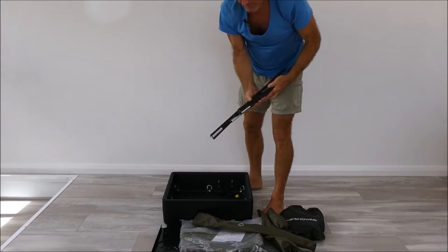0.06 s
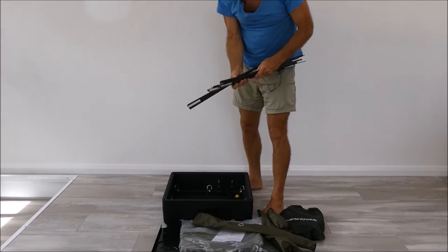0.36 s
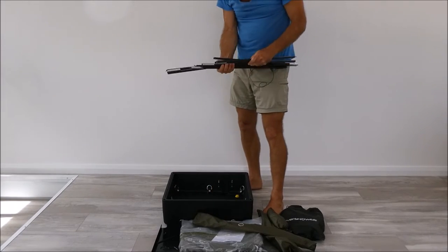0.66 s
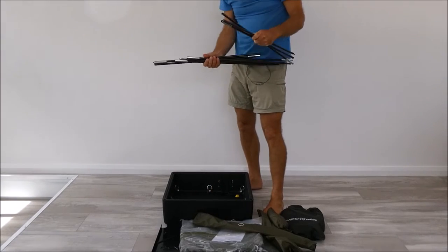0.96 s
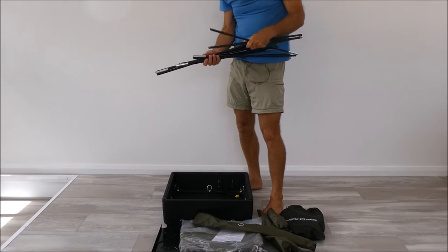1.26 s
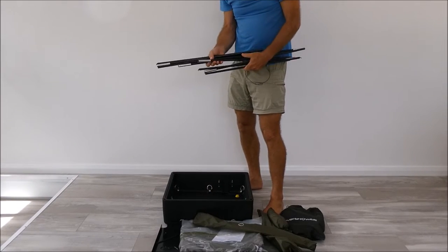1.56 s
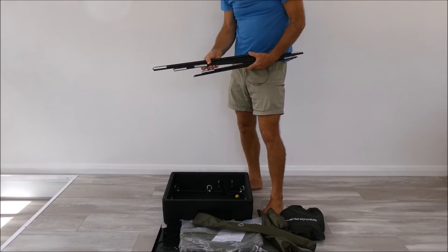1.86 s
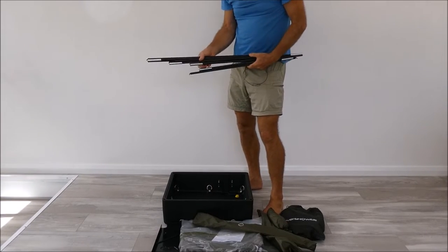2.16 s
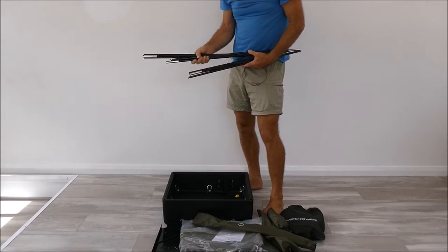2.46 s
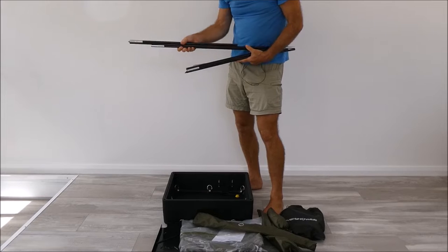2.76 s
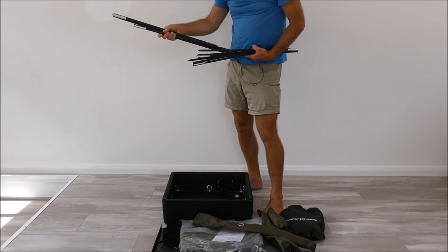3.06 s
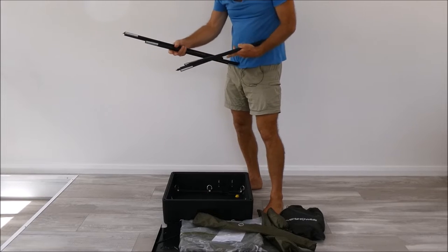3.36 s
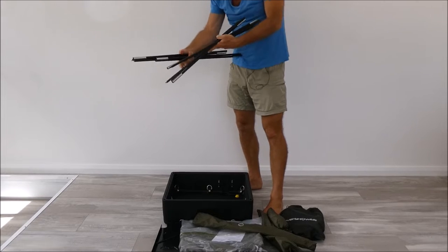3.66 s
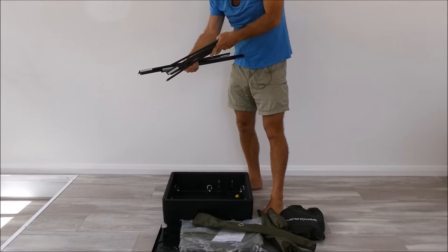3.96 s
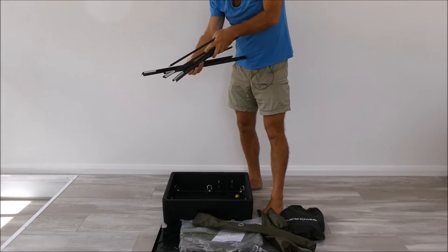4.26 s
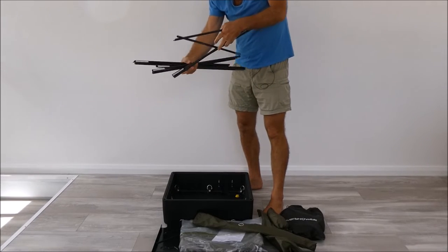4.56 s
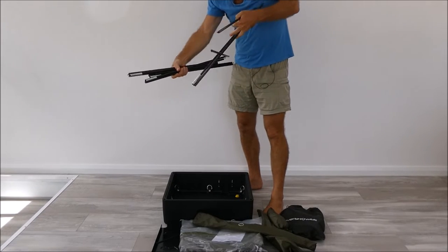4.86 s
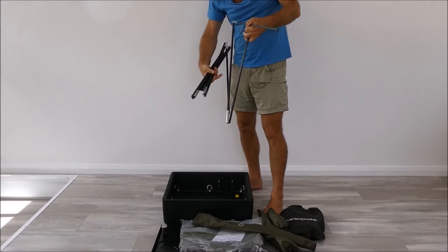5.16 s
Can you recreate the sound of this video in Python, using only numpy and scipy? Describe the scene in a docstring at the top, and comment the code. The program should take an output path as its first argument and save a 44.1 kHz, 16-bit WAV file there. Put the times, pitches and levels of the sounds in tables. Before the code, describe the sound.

Jointed metal poles are sorted by hand in a bare room while crickets chirr steadily outside. Clothes rustle softly at first as the tubes slide and tick together, and a joint squeaks faintly. The short, damped clinks then come thicker and harder, before ending with a last slide, two light clinks and a brief chirp from a closer cricket. The sound is mono, with a slight room echo.

```python
"""Jointed metal tent poles are sorted by hand in a bare room while crickets chirr outside.
First clothes rustle, a closer cricket calls and the gripped tubes slide and knock in short damped clinks.
From 1 to 1.8 s a joint squeaks faintly. From 2.3 to 4.8 s the knocks come thicker and harder;
at the hardest the recorder's gain control ducks with a brief low thump, then creeps back.
After 5 s come a last slide, two light clinks and one more close cricket call."""
import sys
import numpy as np
from scipy import signal
from scipy.fft import rfft, irfft
from scipy.io import wavfile
from scipy.ndimage import uniform_filter1d, map_coordinates

SR = 44100
rng = np.random.default_rng(int(sys.argv[2]) if len(sys.argv) > 2 else 0)


def bounce(signal):
    """Save signal as a 16-bit WAV file at the path given by the first command-line argument."""
    frames = np.transpose(np.atleast_2d(signal))
    limited = np.clip(frames, -1, 1)
    pcm = np.round(limited * 32767).astype(np.int16)
    wavfile.write(sys.argv[1], SR, pcm)


N = 234642
TIME_S = np.arange(N) / SR


def from_db(db):
    """Decibels to gain."""
    return 10 ** (np.asarray(db) / 20)


def unit_rms(x):
    """Scale to rms 1."""
    return x / np.sqrt(np.mean(x ** 2) + 1e-20)


def in_time(rows):
    """Join (time, value) rows by straight lines."""
    return np.interp(TIME_S, *np.transpose(rows))


def at_hz(spectrum, hz):
    """Read a spectrum on a log-frequency axis."""
    knots_hz, db = np.transpose(spectrum)
    return np.interp(np.log(np.maximum(hz, 1)), np.log(knots_hz), db)


def coloured(x, spectrum):
    """Filter by a spectrum; rms 1."""
    gains = from_db(at_hz(spectrum, np.fft.rfftfreq(len(x), 1 / SR)))
    return unit_rms(irfft(rfft(x) * gains, len(x)))


def drift(rate_hz):
    """Smooth random curve; rms 1."""
    knots, coarse_s = rng.standard_normal(4096), TIME_S[::32]
    curve = map_coordinates(knots, [coarse_s * rate_hz], order=2, mode="wrap")
    return np.interp(TIME_S, coarse_s, unit_rms(curve))


def bump(middle_s, half_s):
    """Gaussian swell of height 1."""
    return np.exp(-((TIME_S - middle_s) / half_s) ** 2)


# room tone spectrum: (frequency [Hz], level [dB])
TONE_SPECTRUM = [(20, -32.5), (38, -12), (53, 8.5), (68, 2), (95, 2), (200, -4.5), (450, -5.5), (1000, -8),
                 (2500, -7), (8000, -13.5)]

def room_tone(tone_db=-57.0, hum_db=-70.0, hum_hz=67.0):
    """Steady low noise with a faint wavering hum."""
    tone = from_db(tone_db) * coloured(rng.standard_normal(N), TONE_SPECTRUM)
    hum_gain = from_db(hum_db + 3.0 * drift(11))
    hum = unit_rms(np.sin(2 * np.pi * hum_hz * TIME_S + 1.8 * drift(13)))
    return tone + hum_gain * hum


# floor and wall reflections: (delay [s], level [dB])
EARLY_ECHOES = [(.0047, -16), (0.0101, -23.5), (0.0156, -20)]

def room(x, t60_s=0.38, tail_db=-6.5, build_s=0.0024):
    """Add early echoes and a diffuse tail that favours no single pitch."""
    t = TIME_S[:SR // 2]
    spectrum = rfft(rng.standard_normal(len(t)) * from_db(-60 * t / t60_s))
    flattened = irfft(spectrum / np.sqrt(uniform_filter1d(np.abs(spectrum) ** 2, size=25)), len(t))
    tail = flattened * (1 - np.exp(-t / build_s)) * (1 - (t / t[-1]) ** 2)
    tail = coloured(tail, [(300, 1), (2100, 2), (3000, 0.5), (4500, -3.5), (7500, -1.5)])
    response = from_db(tail_db) * tail / np.sqrt(len(t))
    for delay_s, db in EARLY_ECHOES:
        response[int(delay_s * SR)] += from_db(db)
    return x + signal.fftconvolve(x, response)[:N]


# wing resonance: (frequency [Hz], level [dB])
WING_SPECTRUM = [(3400, -18), (3950, -14), (4400, -6.5), (4850, 1), (5300, 2), (5720, 0), (6160, -4),
                 (6400, -21), (7100, -22.5), (8000, -37.5)]

def cricket(pulse_hz, waver=0.000905, flicker_db=3.0, smear_rad=0.45, scatter_rad=0.88):
    """Wing pulse train; its overtones, shaped by the wing, flicker and are smeared by echoes."""
    phase = 2 * np.pi * np.cumsum(pulse_hz * (1 + waver * drift(14))) / SR
    out = 0
    for k in range(18, 32):
        gain = from_db(at_hz(WING_SPECTRUM, k * pulse_hz) + flicker_db * drift(14))
        out += gain * np.cos(k * phase + smear_rad * drift(16) + scatter_rad * drift(1.57))
    return unit_rms(out)


# near crickets: (wing pulse rate [Hz], level [dB])
NEAR_CRICKETS = [(220, 0), (216, -7.5), (209.2, -12), (238.5, -16)]
# far crickets: (frequency [Hz], level [dB])
FAR_SPECTRUM = [(2500, -30), (3900, -8.5), (4600, -8), (5250, 8.5), (5900, 1.5), (6400, -0.5), (7300, -8),
                (8000, -35.5)]

def chorus(near_db=-42.5, far_db=-46.0, throb_db=0.9):
    """A few near crickets over the blur of many far ones."""
    near = sum(from_db(db) * cricket(hz) for hz, db in NEAR_CRICKETS)
    near_gain = from_db(near_db + throb_db * drift(32))
    far = coloured(rng.standard_normal(N), FAR_SPECTRUM)
    return near_gain * near + from_db(far_db) * far


# calls of a closer cricket: (time [s], level [dB])
CLOSE_CALLS = [(.06, -39.5), (.48, -45), (.81, -41.5), (5.11, -38.5)]

def close_cricket(pulse_hz=220, wing_hz=5720, half_s=0.036, waver_rad=0.87):
    """Short calls: one wing resonance, throbbing with the wing pulses."""
    pulses = 1 + np.cos(2 * np.pi * pulse_hz * TIME_S + waver_rad * drift(30))
    wing = np.sin(2 * np.pi * wing_hz * TIME_S + waver_rad * drift(60))
    envelope = sum(from_db(db) * bump(time_s, half_s) for time_s, db in CLOSE_CALLS)
    return envelope * unit_rms(pulses * wing)


# clothes moving: (time [s], level [dB])
CLOTH_LEVELS = [(0, -65), (.15, -59.5), (.45, -69.5), (1.8, -69.5), (2.8, -73), (5.32, -67.5)]
# their rustle: (frequency [Hz], level [dB])
CLOTH_SPECTRUM = [(100, -19), (260, 1), (480, 4), (800, -5), (1400, -19.5), (3000, -23)]

def clothes(flutter_db=2.0):
    """Soft rustle of moving cloth, most while straightening up."""
    envelope = from_db(in_time(CLOTH_LEVELS) + flutter_db * drift(30))
    return envelope * coloured(rng.standard_normal(N), CLOTH_SPECTRUM)


# joint rubs: (time [s], pitch [Hz], level [dB], half length [s])
JOINT_RUBS = [(1.029, 2088, -43.5, 0.0048), (1.042, 2034, -49, 0.0093), (1.447, 2126, -49, 0.027),
              (1.658, 2014, -49, .02), (1.726, 2050, -49, .02)]

def squeaks(waver=0.045, rough_db=2.0):
    """Brief rough tones where a joint rubs."""
    bend, roughness = 1 + waver * drift(500), from_db(rough_db * drift(250))
    out = 0
    for time_s, hz, db, half_s in JOINT_RUBS:
        tone = np.sin(2 * np.pi * np.cumsum(hz * bend) / SR)
        out += from_db(db) * bump(time_s, half_s) ** 2 * tone
    return roughness * out


# tube modes, for slides and clinks: (frequency [Hz], level [dB])
TUBE_MODES = [(1070, -18.5), (1420, -22), (2020, -15.5), (2380, -11.5), (2930, -4.5), (3220, -3.5),
              (3620, 0), (3980, -3.5), (4330, 5), (4850, 6), (5230, 6), (5600, -2), (5930, 2.5), (6260, -1),
              (6850, 2), (7420, -0.5)]
# tubes sliding through the hands: (time [s], half length [s], level [dB])
SLIDE_STROKES = [(0.02, .07, -55), (0.683, .14, -50.5), (1.46, .16, -54), (1.795, 0.19, -49),
                 (2.4, 0.11, -49), (3.028, 0.28, -49), (4.45, 0.45, -52.5), (5.174, 0.15, -49)]

def sliding(slips_per_s=1100, size_db=2.0, clump_db=5.5, t60_s=0.0051, dull_db=-14.5, fidget_db=-61.5):
    """Tiny uneven slips excite the tube modes, in smooth strokes over a restless grip."""
    sizes = from_db(size_db * np.minimum(rng.exponential(1, N), 4) + clump_db * drift(35))
    slips = sizes * (rng.random(N) < slips_per_s / SR)
    ring, radius = 0, from_db(-60 / (t60_s * SR))
    for hz, db in TUBE_MODES:
        step_rad = 2 * np.pi * hz / SR
        gain = from_db(db + at_hz([(2800, 0), (5000, dull_db)], hz))
        feedback = [1, -2 * radius * np.cos(step_rad), radius ** 2]
        force = slips * rng.standard_normal(N) + 1e-18
        ring += gain * signal.lfilter([np.sin(step_rad)], feedback, force)
    stroke_power = sum((from_db(db) * bump(time_s, half_s)) ** 2 for time_s, half_s, db in SLIDE_STROKES)
    return np.sqrt(from_db(fidget_db) ** 2 + stroke_power) * unit_rms(ring)


def stray_touches(per_s=2.0, level_db=-44.5, top_hz=4470, t60_s=0.018):
    """Knock rows for faint touches at random gaps."""
    draws = rng.random((int(per_s * N / SR), 2))
    return [((slot + offset) / per_s, level_db, top_hz * 2 ** -octaves, t60_s)
            for slot, (offset, octaves) in enumerate(draws)]


# contact crack: (frequency [Hz], level [dB])
CRACK_SPECTRUM = [(100, -29.5), (600, -13.5), (1300, -11), (2300, 5.5), (4500, 5.5), (6500, 0),
                  (8000, -14.5)]

def clink(colour, ring_gain, t60_s, main_hz, main_db=-6.0, rise_s=0.00025, detune=0.011, spread_db=1.3):
    """Contact crack plus hand-damped tube modes; rms 1 over the first 7 ms."""
    t = TIME_S[:SR // 10]
    hz, mode_db = np.transpose(TUBE_MODES)
    # another tube and another spot at each knock
    tuning, strength, phase = rng.standard_normal((3, len(hz)))
    gains = from_db(mode_db + at_hz(colour, hz) + spread_db * strength)
    cycles = np.outer(hz * (1 + detune * tuning), t) + phase[:, None]
    ring = unit_rms(gains @ np.sin(2 * np.pi * cycles))
    ring += from_db(main_db) * unit_rms(np.sin(2 * np.pi * main_hz * t))
    crack = coloured(rng.standard_normal(len(t)), [(f, db + at_hz(colour, f)) for f, db in CRACK_SPECTRUM])
    envelope = from_db(-60 * t / t60_s) * (1 - np.exp(-(t / rise_s) ** 2))
    knock = (ring_gain * ring + crack) * envelope
    return knock / np.sqrt(np.mean(knock[:SR // 143] ** 2))


# dull body of the knocks: (time [s], gain [dB])
BODY_GAINS = [(0, 9), (.6, 4), (1.8, 6), (3.1, 1.5), (3.85, -6.5), (4.75, 0.5)]
# pole against pole: (time [s], level [dB], main ring [Hz], t60 [s])
KNOCKS = [(0.073, -37, 5700, 0.036), (0.092, -32.5, 4550, 0.015), (0.181, -36.5, 7440, 0.017),
          (0.28, -36.5, 7330, 0.045), (0.357, -35.5, 6860, 0.033), (0.5439, -33, 5900, 0.04),
          (0.598, -29, 5930, 0.063), (0.762, -33, 5150, .03), (1.452, -37, 4980, 0.034),
          (1.609, -36.5, 3950, 0.042), (1.765, -25.5, 5020, 0.027), (1.795, -32.5, 3090, 0.067),
          (2.107, -39, 4060, 0.058), (2.2879, -32.5, 5300, 0.015), (2.315, -37, 5540, 0.013),
          (2.349, -29.5, 6990, 0.039), (2.464, -39.5, 3080, 0.03), (2.583, -34, 7160, 0.015),
          (2.616, -32.5, 6130, .008), (2.6756, -23.5, 4330, 0.019), (2.6906, -19.5, 6740, 0.0095),
          (2.77, -29.5, 7060, .02), (2.784, -29.5, 7350, 0.015), (2.939, -35.5, 4860, .025),
          (2.949, -34.5, 6050, 0.027), (3.016, -29.5, 2870, 0.019), (3.034, -29.5, 3510, 0.034),
          (3.189, -36, 4900, 0.04), (3.21, -24, 3380, .028), (3.454, -43.5, 4470, 0.012),
          (3.709, -43, 4230, 0.022), (3.8545, -20, 3150, 0.019), (4.022, -38, 2850, 0.012),
          (4.2102, -19, 4794, 0.032), (4.2274, -25.5, 4210, 0.049), (4.264, -26, 5000, 0.0094),
          (4.29, -35.5, 2180, 0.026), (4.4192, -26.5, 3970, .024), (4.454, -36.5, 4300, 0.016),
          (4.542, -24.5, 6000, 0.05), (4.671, -33.5, 3980, 0.045), (4.69, -35, 3740, 0.043),
          (4.7203, -18.5, 3300, .018), (4.729, -32.5, 3810, 0.016), (4.777, -35, 5200, 0.024),
          (4.782, -27.5, 7430, 0.011), (4.8155, -30.5, 3230, 0.022), (4.826, -32, 3600, 0.011),
          (5.187, -40, 3540, 0.026), (5.232, -45.5, 6100, 0.014)]

def knocks(middle_hz=4470, low_db_per_oct=-9, high_db_per_oct=8.5,
           free_t60_s=0.019, grip_db_per_halving=6.5, usual_db=-28, hard_db_per_db=0.22):
    """Tubes strike each other: a higher ring is brighter overall, a tight grip leaves a dry tick."""
    out, body_db = np.zeros(N + SR), in_time(BODY_GAINS)
    for time_s, db, ring_hz, t60_s in KNOCKS + stray_touches():
        start, octaves = int(time_s * SR), np.log2(ring_hz / middle_hz)
        ring_gain = min(t60_s / free_t60_s, 1)
        grip_db = grip_db_per_halving * np.log2(ring_gain)
        hard_loss_db = hard_db_per_db * (db - usual_db)  # harder blow, shorter contact, weaker low modes
        low_db = -0.5 + low_db_per_oct * octaves - hard_loss_db + grip_db
        high_db = 1.5 + high_db_per_oct * octaves
        colour = [(1550, body_db[start] + grip_db), (2250, low_db), (2800, low_db),
                  (3800, 0), (5200, 0), (6200, high_db)]
        knock = clink(colour, ring_gain, t60_s, ring_hz)
        out[start:start + len(knock)] += from_db(db) * knock
    return out[:N]


def gain_thumps(rise_s=0.00024, thump_db=-43.5, hard_db=-20.5, growth_db_per_db=2.2):
    """Brief low thump as the recorder's gain control clamps down on the hardest knocks."""
    impulses, age = np.zeros(N), TIME_S[:SR // 100] / rise_s
    for time_s, db, _, _ in KNOCKS:
        impulses[int(time_s * SR)] = from_db(thump_db + growth_db_per_db * (db - hard_db))
    return signal.fftconvolve(impulses, age * np.exp(1 - age))[:N]


def scene():
    """Room tone, crickets and clothes behind the poles in the room, plus the gain thumps; mono."""
    background = room_tone() + chorus() + close_cricket() + clothes()
    poles = room(squeaks() + sliding() + knocks())
    return (background + poles + gain_thumps())[None]


def record(dry, limit_db=-21.5, release_db_per_s=11.0, low_cut_hz=32, high_cut_hz=7650):
    """Gain control with instant attack and slow recovery, then steep low and high cuts."""
    power = uniform_filter1d(dry[0] ** 2, size=50)
    over_db = np.maximum(10 * np.log10(np.maximum(power, 1e-12)) - limit_db, 0)
    release_db = release_db_per_s * TIME_S
    held_db = np.maximum.accumulate(over_db + release_db) - release_db
    levelled = dry * from_db(-uniform_filter1d(held_db, size=30))
    levelled = signal.sosfilt(signal.butter(4, low_cut_hz, "high", fs=SR, output="sos"), levelled)
    return signal.sosfilt(signal.butter(28, high_cut_hz, fs=SR, output="sos"), levelled)


dry = scene()
out = record(dry)
bounce(out)
```